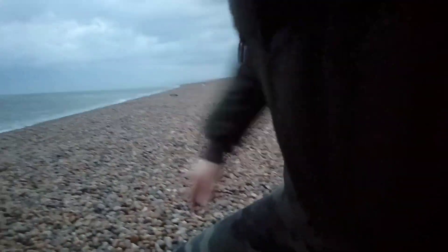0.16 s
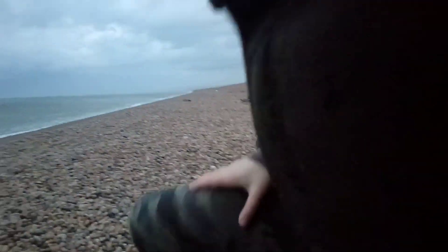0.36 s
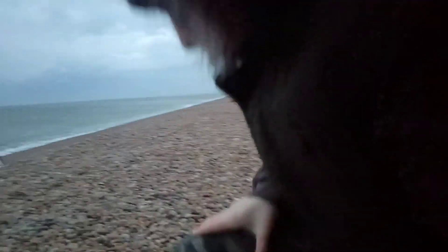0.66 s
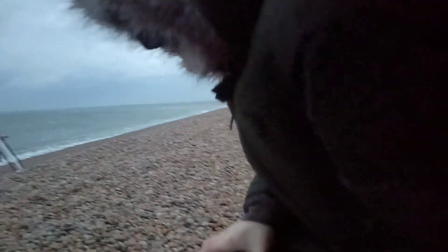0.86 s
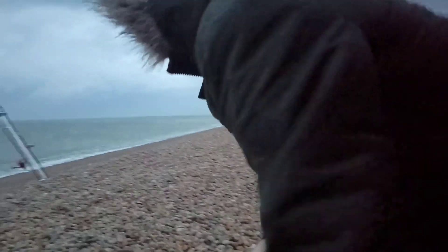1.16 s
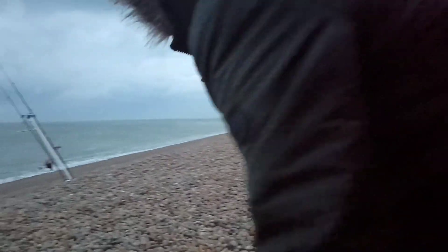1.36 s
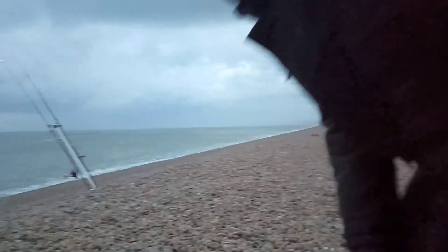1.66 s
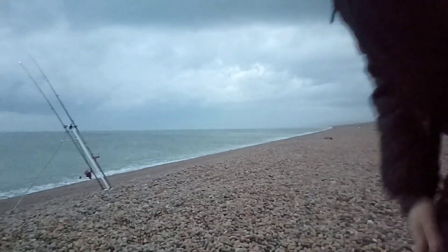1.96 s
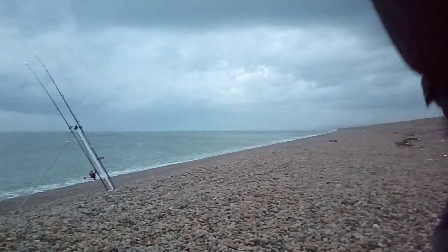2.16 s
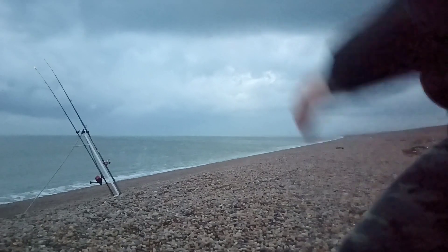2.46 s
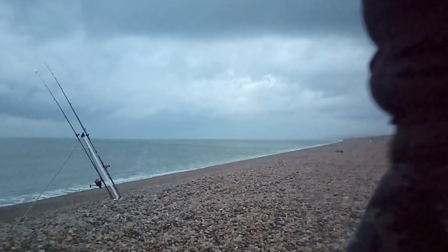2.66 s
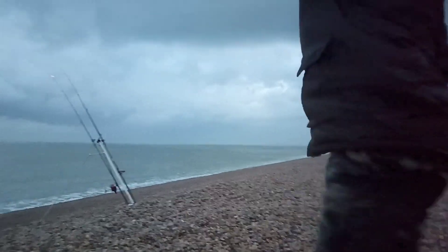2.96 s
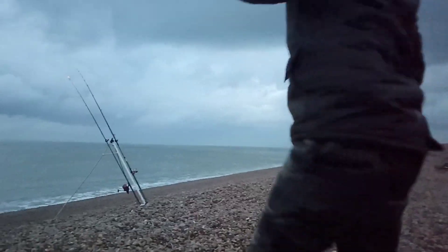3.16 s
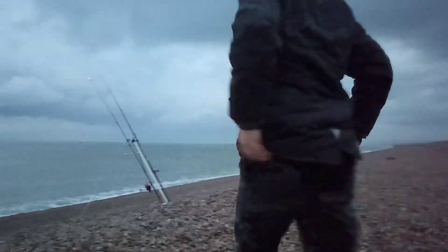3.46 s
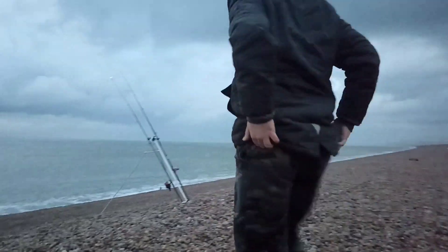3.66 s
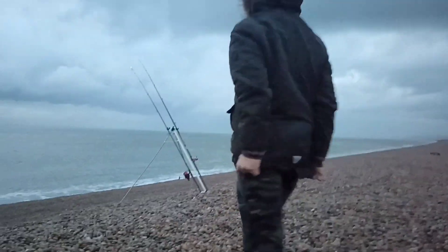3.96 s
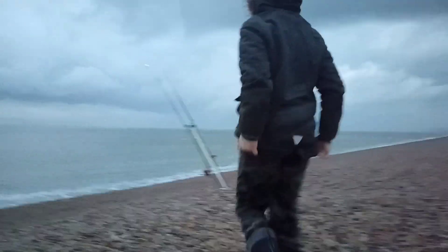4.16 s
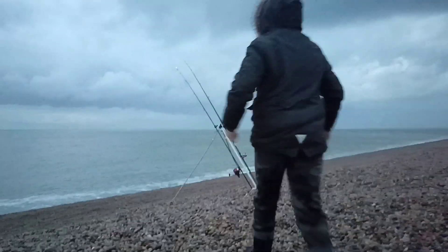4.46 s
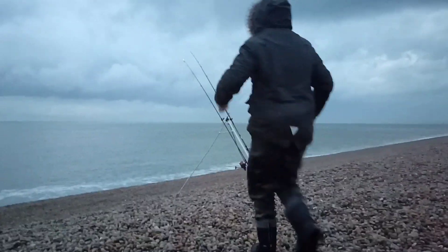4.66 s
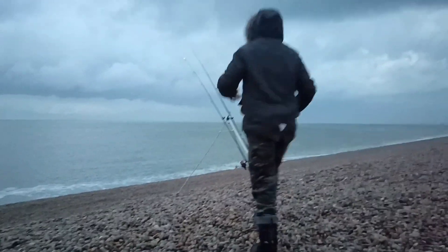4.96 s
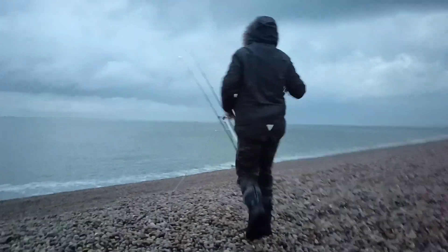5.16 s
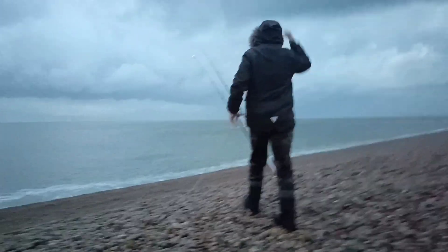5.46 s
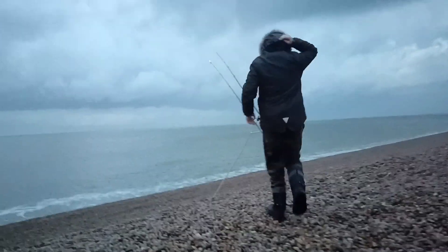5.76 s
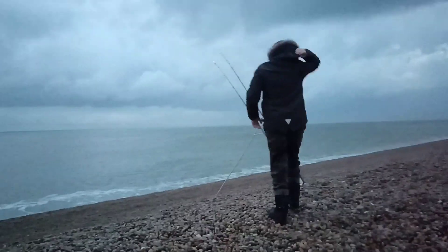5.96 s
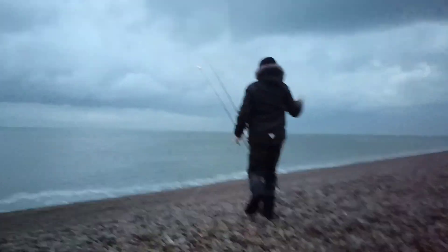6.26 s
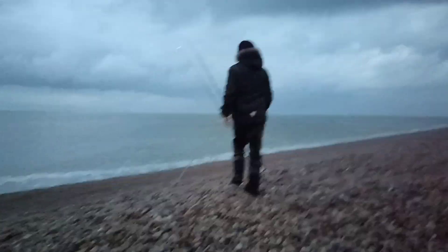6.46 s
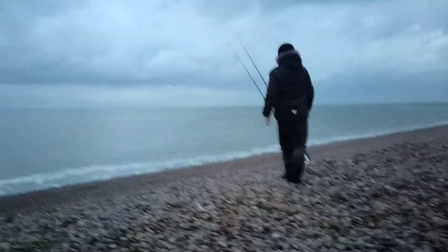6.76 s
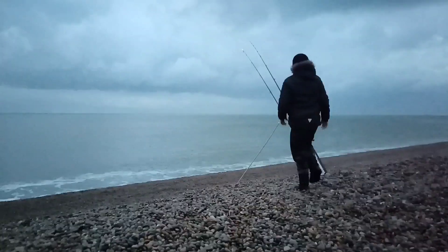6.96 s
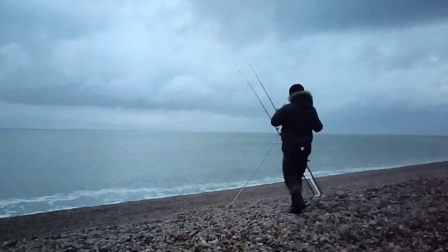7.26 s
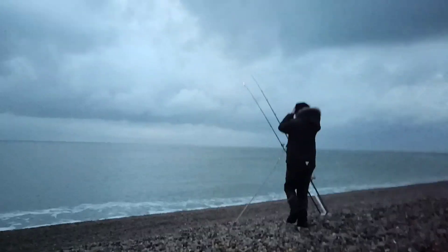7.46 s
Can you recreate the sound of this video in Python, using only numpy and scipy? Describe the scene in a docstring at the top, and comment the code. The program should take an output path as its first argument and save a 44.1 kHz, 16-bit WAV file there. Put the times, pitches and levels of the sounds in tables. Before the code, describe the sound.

Outdoors on a shingle beach, close stereo hand-held microphone, no echo. It starts almost quiet, then from about 0.25 s boots grind into loose pebbles, slightly left, with sharp stone clacks, strongest around 0.3-0.8 s. Looser crunches come near 1.4 and 1.7 s, with hollow knocks of bigger stones. Around 1.9-2.6 s the stones nearly stop: two very faint, thin metallic pings, and at 2.45 s a brief low cloth bump and swish on the right. Crunching resumes at 2.8 s, with a dense burst of pebbles at 3.0-3.4 s, then a step at 4.0 and scattered clacks. From 4.7 to 6.2 s the walker moves off and the stones sound more distant, yet long gritty steps and bright clacks continue, clustering at 7.0-7.5 s. Soft low wind puffs appear near 5.3, 5.7, 6.8 and 7.4 s. Faint surf and hiss persist underneath.

```python
"""From the start, boots grind a shingle beach beside a hand-held camera, over faint surf, light wind and hiss.
Someone gets up and trudges: each step drives random stone contacts; kicked pebbles clack, big stones knock, and
near 1.5 s something scuffs with two hollow rings. Two faint metallic pings are decaying sines; near 2.4 s a
coat brushes the right microphone port as shaped noise. From 4.7 to 6.2 s the stones take on a more distant
colour as the walker moves off, still stepping to the end. Throughout, the right port favours sound near 6 kHz
and the left near 7 kHz."""
import sys
import numpy as np
from scipy import signal
from scipy.fft import rfft, irfft, next_fast_len
from scipy.io import wavfile
from scipy.ndimage import uniform_filter1d, map_coordinates

SR = 44100
rng = np.random.default_rng(int(sys.argv[2]) if len(sys.argv) > 2 else 0)


def dump(signal):
    """Clip the signal to [-1, 1] and save it as 16-bit WAV at the path in sys.argv[1]."""
    limited = np.clip(np.atleast_2d(signal).T, -1, 1)
    pcm = np.round(limited * 32767).astype(np.int16)
    wavfile.write(sys.argv[1], SR, pcm)


N = 335601

# Where the boots are, left or right of the microphone: (time [s], left minus right [dB])
BOOT_PLACE = [(0, 3.5), (1.2, 1), (1.7, 0.5), (3.2, 1), (3.7, -0.5), (4.8, -1.5), (6.2, 3), (7.61, -0.5)]
# Arrival lag of the boots at the left port, scaled for each contact: (time [s], lag [s])
LEFT_LAG = [(1.5, 0.00042), (2.5, 0.00037), (4.6, 0.000074), (5.3, .00036), (7.5, 0.00028)]
# A boot loads the bed, bears on it and lets go; levels are at full force:
# (start [s], rise [s], hold [s], release [s], surface clatter [dB], grinding below [dB],
#  hard-contact sparkle [dB], thud [dB])
STEPS = [ (0.0, 0.0061, 0.13, 0.073, -45.5, -48, -87, -60.5),
         (0.248, 0.042, 0.12, 0.078, -23, -28, -31.5, -44.5),
         (0.553, 0.049, 0.048, 0.2, -20.5, -32.5, -35.5, -40),
         (0.832, 0.074, 0.12, 0.24, -28, -36, -63.5, -45.5),
         (0.986, 0.065, 0.12, 0.055, -33, -33.5, -50.5, -46.5),
         (1.385, 0.03, 0.026, 0.09, -21, -44, -45.5, -43),
         (1.429, 0.076, 0.05, 0.1, -23, -27.5, -29, -36.5),
         (1.715, 0.012, 0.03, 0.095, -16, -28.5, -31, -36.5),
         (2.245, 0.16, 0.061, 0.16, -49.5, -48.5, -87.5, -73),
         (2.77, 0.0099, 0.044, 0.11, -19, -33.5, -38.5, -47),
         (2.859, 0.15, 0.011, 0.11, -21.5, -34.5, -38, -48.5),
         (3.391, 0.11, 0.14, 0.063, -20, -33, -43.5, -43.5), (3.833, .06, .09, .1, -45, -49.5, -87.5, -83),
         (3.973, 0.0099, .028, 0.062, -20, -33.5, -28.5, -35),
         (3.981, 0.055, 0.05, 0.18, -24, -34.5, -43, -45), (4.246, 0.069, .2, .06, -50, -52.5, -76, -76),
         (4.523, 0.056, .12, 0.046, -24, -35.5, -49, -64),
         (5.06, 0.061, 0.091, 0.14, -26.5, -34.5, -54, -49.5),
         (5.199, 0.2, 0.21, 0.15, -19, -39.5, -34, -43),
         (5.617, 0.065, 0.23, 0.11, -18.5, -33.5, -36.5, -42.5),
         (5.907, 0.058, 0.12, .1, -29, -37.5, -62, -46.5),
         (6.067, 0.029, 0.043, 0.18, -20.5, -37.5, -43.5, -66.5),
         (6.169, 0.056, .12, 0.38, -18.5, -30, -42, -48),
         (6.449, 0.17, 0.06, 0.084, -22.5, -29.5, -43, -44.5),
         (6.625, 0.1, 0.16, 0.136, -32.5, -34.5, -62, -47.5),
         (6.758, .15, 0.088, 0.12, -22.5, -61.5, -45.5, -49),
         (6.997, 0.076, 0.12, 0.11, -23.5, -61, -46, -47),
         (7.211, 0.061, 0.11, 0.24, -23, -44.5, -47, -45.5),
         (7.408, .06, 0.066, 0.088, -25.5, -67, -43.5, -45.5)]
# Spectrum of the surface stones: (frequency [Hz], relative density [dB per Hz])
CLATTER_SPECTRUM = [(300, -53), (900, -39), (1500, -25.5), (2200, -13.5), (3200, -12), (4700, -5),
                    (5500, 0.5), (6000, 2.5), (6700, -2), (7400, -9.5), (8400, -28.5), (9500, -43),
                    (12000, -43.5), (16000, -85.5)]
# Spectrum of the buried stones: (frequency [Hz], relative density [dB per Hz])
GRIND_SPECTRUM = [(120, -24), (300, -2), (500, -3.5), (730, -2), (950, 0), (1450, 3.5), (2100, 7.5),
                  (3000, 2), (4500, 3.5), (8000, -51)]
# Spectrum of the hardest contacts: (frequency [Hz], relative density [dB per Hz])
SPARKLE_SPECTRUM = [(5000, -31.5), (7500, 13), (9000, 3.5), (10000, -1.5), (11500, -6), (13000, -15),
                    (16000, -20)]
# Spectrum of the thuds and wind rumble: (frequency [Hz], relative density [dB per Hz])
RUMBLE_SPECTRUM = [(25, -24), (60, -18), (90, -1), (130, 2.5), (180, -0.5), (260, -4.5), (350, -17),
                   (600, -38.5), (1500, -54)]
# Light wind on the ports: (time [s], level [dB])
BREEZE = [(0, -69), (1.9, -63), (2.7, -63), (3.8, -61.5), (5.0, -84), (5.25, -61.5), (7.61, -67)]
# Low puffs over the breeze: (centre time [s], peak level [dB], half-length to 1/e [s])
PUFFS = [(3.101, -41, 0.031), (3.417, -42.5, 0.055), (4.331, -48, 0.021), (5.255, -38, 0.013),
         (5.362, -28.5, 0.016), (5.728, -31, .05), (5.883, -42.5, 0.021), (6.795, -34.5, .08),
         (7.274, -38.5, .05), (7.476, -33.5, 0.013)]
# Spectrum of the surf: (frequency [Hz], relative density [dB per Hz])
SURF_SPECTRUM = [(25, -21), (60, 0), (120, -4), (240, -11.5), (450, -7), (1500, -8.5), (3500, -16.5),
                 (6000, -14), (9000, -19.5), (16000, -38.5)]
# Kicked pebbles, before placing:
# (strike time [s], strike peak [dB], neighbours' rattle re strike [dB], sparkle re strike [dB])
KICKED_PEBBLES = [(.013, -20.5, -22.5, -36), (.1777, -19.5, -21.5, -37), (.1903, -21, -13, -53),
                  (.2217, -25, -10.5, -25.5), (.2999, -9, -10, -14.5), (.3798, -7, -11.5, -6),
                  (.4584, -1, -20, -10), (.5143, -9, -12.5, -18.5), (.5733, -8, -14.5, -2.5),
                  (.5996, -8, -10, -9), (.7211, -8.5, -18, -31), (.8013, -15.5, -9.5, -25.5),
                  (1.0713, -10.5, -4.5, -20), (1.2695, -33.5, -2.5, -47), (1.3998, -23, -4.5, -34),
                  (1.7286, -12, -8.5, -9), (1.9375, -22, -9.5, -9), (2.025, -50, -12, -25),
                  (2.6712, -43, -17, -8), (2.7247, -37.5, -14, -20), (2.9999, -12.5, -2, -20),
                  (3.0484, -8.5, -11.5, -13), (3.0757, -11, -7, -8), (3.1611, -11.5, -15, -12),
                  (3.1925, -18, -11, -4), (3.1973, -4.5, -15, -8.5), (3.2216, -23, -10, -25.5),
                  (3.2616, -17, -12.5, -12.5), (3.3235, -12.5, -9, -7), (3.5158, -9.5, -7.5, -23),
                  (3.9784, -7.5, -15.5, -22), (4.2037, -8.5, -20, -23.5), (4.266, -11, -19.5, -16.5),
                  (4.3149, -20.5, -24, -41), (4.3757, -11, -22.5, -12), (4.3961, -18.5, -23.5, -16.5),
                  (4.4145, -28.5, -9, -17), (4.5477, -15.5, -12.5, -24), (4.7013, -22.5, -23, -22),
                  (4.7515, -23.5, -20.5, -19.5), (5.0655, -17.5, -16.5, -23), (5.1343, -18.5, -2, -33),
                  (5.443, -12, -15, -1.5), (5.5376, -5.5, -10.5, -12.5), (5.5992, -7, -12, -8.5),
                  (5.645, -6, -29, -8), (5.7546, -7.5, -15.5, -7), (5.805, -6.5, -18.5, -19),
                  (5.887, -10, -13, -17.5), (6.1082, -17.5, -9.5, -10.5), (6.152, -10.5, -13, -13.5),
                  (6.3331, -13.5, -12.5, -18), (6.905, -10.5, -9.5, -18.5), (6.9533, -3.5, -17, -24),
                  (6.971, -4.5, -21.5, -23.5), (6.9822, -5, -20.5, -16.5), (7.0374, -5, -15.5, -17.5),
                  (7.0669, -3, -17.5, -11.5), (7.1204, -11, -13, -5), (7.1308, -8, -21.5, -2.5),
                  (7.1939, -10, -10, -9.5), (7.26, -12, -18.5, -15), (7.312, -12, -12, -32.5),
                  (7.355, -8, -13.5, -17.5), (7.4213, -10.5, -12.5, -12), (7.4896, -9, -16, -11.5),
                  (7.5429, -8, -21, -13)]
# Big stones knocking hollowly, and near 1.5 s a scuff ringing at two pitches: (time [s], peak [dB], ring [Hz],
# chatter's 60 dB decay [s])
KNOCKS = [(0.531, -40, 1015, 0.16), (0.674, -29, 620.5, 0.059), (.68, -30, 1090, 0.049),
          (1.5, -26.5, 744, 0.26), (1.503, -24.5, 1450, 0.27), (1.74, -36.5, 824, 0.073),
          (2.768, -29, 2374, .08), (3.196, -48, 604, 0.014), (4.06, -33.5, 570, 0.066),
          (4.324, -45, 830, 0.037), (4.327, -34.5, 1190, 0.11), (4.466, -41.5, 1290, 0.11)]
# Something small and metallic jolted, level before its flutter: (time [s], level [dB])
PINGS = [(1.934, -50.5), (2.49, -55)]
# Spectrum of the air that the coat pumps into the port: (frequency [Hz], relative density [dB per Hz])
COAT_SPECTRUM = [(30, -44), (70, -7.5), (110, 14.5), (170, -8.5), (250, 0), (330, -14), (500, -15),
                 (750, -45), (2000, -69.5)]
# Spectrum of the cloth's hiss: (frequency [Hz], relative density [dB per Hz])
SWISH_SPECTRUM = [(350, -44), (600, -13), (1220, -24), (1820, -12), (4000, -9), (5940, 0), (7050, -4),
                  (9680, -40), (14000, -55)]
# Colour of the stones when the walker is far: (frequency [Hz], gain [dB])
FAR_COLOUR = [(250, 2.5), (480, 3), (850, 0.5), (1400, 1), (2200, -3), (3200, 1.5), (6000, -3), (10000, 4),
              (15000, -8)]
# Response of the microphone ports, right near 6 kHz and left near 7 kHz: (frequency [Hz], left minus right [dB])
PORT_BALANCE = [(60, -6), (200, -2.5), (400, -2), (770, -1), (1200, -4.5), (1650, -7), (2300, -2),
                (2750, 1.5), (3600, -3), (4800, -4), (5900, -10.5), (7300, 6.5), (8300, 3.5), (13000, 1)]

SWING_DB = 24.5  # a step climbs this far during its rise and falls this far during its release
STROKE_BEND = 1.17  # over 1: a step lets go ever faster, so the gaps stay quiet
GRIND_SWING, SPARKLE_SWING, THUD_SWING = 0.72, 1.73, 0.57  # sparkle needs force; grinding and thud linger
LUMPS_PER_S, LUMPS_DB = 22, 2.5  # thud and breeze come in uneven lumps
LEAD_S = .003  # a kicked pebble grazes its neighbours this long before it strikes
# Stray stones: how many, how late, peak after a 0 dB clatter, dB per dB of clatter, scatter either way
STRAYS_PER_S, STRAY_DELAY_S, STRAY_DB, STRAY_FOLLOW, STRAY_SCATTER_DB = 11, 0.033, 2, 0.81, 0.5
PING_HZ, PING_T60_S = 1890, 0.37
BRUSH_START_S, BRUSH_RISE_S, BRUSH_HOLD_S, BRUSH_RELEASE_S = 2.443, 0.0099, 0.019, 0.026
BRUSH_DB, SWISH_DB, SWISH_SWING = -15, -27, 0.69  # at full force, before the high-pass and the split to ports
LEAVES_S, FAR_S = 4.7, 6.2  # the walker moves off between these times
HISS_DB = -82.5  # the microphone's own noise
TOP_HZ = 16200  # band limit


def amp(db):
    """Decibels to gain."""
    return np.exp(np.asarray(db) * float(np.log(10) / 20))


def unit(x):
    """x at rms 1."""
    return x / np.sqrt(np.mean(x ** 2) + 1e-20)


def to_peak(x):
    """Each channel of x at peak 1."""
    return x / np.abs(x).max(-1, keepdims=True)


def along(points, hz):
    """(Hz, value) points read on a log frequency axis."""
    f, v = np.transpose(points)
    return np.interp(np.log(hz + 1), np.log(f + 1), v)


def curves(rows):
    """One value per sample for each column after the time."""
    s, *cols = np.transpose(rows)
    return [np.interp(np.arange(N) / SR, s, c) for c in cols]


def coloured(x, spectrum):
    """x through the causal, minimum-phase filter that has this spectrum."""
    n = x.shape[-1]
    m = 2 * next_fast_len(n // 2 + 2048)
    cepstrum = irfft(np.log(amp(along(spectrum, np.fft.rfftfreq(m, 1 / SR)))))
    # folding the cepstrum onto positive time makes the filter causal
    cepstrum[1:m // 2] *= 2
    cepstrum[m // 2 + 1:] = 0
    return irfft(rfft(x, m) * np.exp(rfft(cepstrum)), m)[..., :n]


def steady(x, span):
    """x held near rms 1 over span seconds, keeping its faster grain."""
    size = max(int(span * SR), 2)
    power = uniform_filter1d(uniform_filter1d(np.mean(x ** 2, 0), size), size)
    return x / np.sqrt(np.abs(power) + 1e-12)


def noise(spectrum, alike):
    """Stereo noise, partly shared by both ports."""
    alike = np.clip(alike, 0, 1)
    w = rng.standard_normal((3, N))
    return unit(coloured(np.sqrt(alike) * w[0] + np.sqrt(1 - alike) * w[1:], spectrum))


def wobble(rate):
    """A smooth random curve, rate knots a second."""
    knots = rng.standard_normal(int(N * rate / SR) + 4)
    return map_coordinates(knots, [np.arange(N) * rate / SR])


def mottled(x, depth_db, size):
    """The colour shifts from moment to moment: patches of gain, a few bins wide and a few frames long."""
    z = signal.stft(x, nperseg=size)[2]
    field = rng.standard_normal(z.shape[1:])
    field = uniform_filter1d(uniform_filter1d(field, size=3, axis=0), size=3, axis=1)
    return signal.istft(z * amp(depth_db * unit(field)), nperseg=size)[1][:, :N]


def stroke_db(t, rise, hold, release):
    """Rise, hold and release, in dB re full force, t seconds after the start."""
    rising = 1 - t / max(rise, 1e-3)
    releasing = (t - rise - hold) / max(release, 1e-3)
    short = np.maximum(rising, releasing)
    return -SWING_DB * np.maximum(short, 0) ** STROKE_BEND


def footwork():
    """Gain of clatter, grinding, sparkle and thud: each step drives all four with one stroke."""
    swing = np.array([[1], [GRIND_SWING], [SPARKLE_SWING], [THUD_SWING]])
    t = np.arange(N) / SR
    power = np.zeros((4, N))
    for start, rise, hold, release, *levels_db in STEPS:
        live = slice(*np.searchsorted(t, [start - 2 * rise, start + rise + hold + 3 * release]))
        force_db = stroke_db(t[live] - start, rise, hold, release)
        power[:, live] += amp(np.array(levels_db)[:, None] + swing * force_db) ** 2
    return np.sqrt(power)


def slips(rate, spread_db, life, creep):
    """The bed gives way in jerks: each starts at once and dies away, over a steady creep."""
    jerks = (rng.random(N) < rate / SR) * amp(spread_db * np.minimum(rng.standard_normal(N), 2))
    return creep + unit(signal.lfilter([1], [1, -np.exp(-1 / (life * SR))], jerks))


def contacts(rate, top_hz, spread_db, life, scatter_db):
    """Stones touching at random: tiny damped rings of any pitch, reaching the right port first."""
    count = min(int(rate * N / SR), 40000)
    draws = rng.random((count, 6)).astype(np.float32)
    when, pitch, phase, size, side, bearing = np.hsplit(draws, 6)
    t = np.arange(96, dtype=np.float32) / SR
    strength = amp(spread_db * np.minimum(-np.log(1 - size), 3))
    rings = np.sin(2 * np.pi * (top_hz * pitch * t + phase)) * np.exp(-t / life) * strength
    start = (when * (N - 1)).astype(int)
    lag = (curves(LEFT_LAG)[0][start] * (0.22 + 1.6 * bearing) * SR).astype(int)

    def port(at, gain):
        """All the rings summed at one port."""
        return np.bincount((at + np.arange(len(t))).ravel(), (gain * rings).ravel(), N)[:N]

    left = port(start + lag, amp(scatter_db * (side - .5)))
    right = port(start, amp(scatter_db * (.5 - side)))
    return np.array([left, right])


def shingle(clatter, grind, sparkle):
    """Boots in the pebbles: bright clatter on top, duller grinding below, sparkle from the hardest contacts."""
    jerks = slips(rate=150, spread_db=4.5, life=0.006, creep=2.3)
    surface = jerks * contacts(rate=4500, top_hz=14510, spread_db=-2.5, life=0.00017, scatter_db=3.5)
    surface = mottled(surface, depth_db=4.0, size=512)
    buried = np.sqrt(jerks) * contacts(rate=4000, top_hz=5000, spread_db=0.0, life=0.0008, scatter_db=4)
    buried = mottled(buried, depth_db=3.5, size=1024)
    return (clatter * steady(coloured(surface, CLATTER_SPECTRUM), span=0.035)
            + grind * steady(coloured(buried, GRIND_SPECTRUM), span=0.011)
            + sparkle * steady(coloured(surface, SPARKLE_SPECTRUM), span=0.0087))


def rumble(thud):
    """The bed thuds under the walker's weight and light wind flutters on the ports: shaped low noise."""
    t = np.arange(N) / SR
    breeze_db, = curves(BREEZE)
    puffs = sum((amp(db) * np.exp(-((t - s) / half) ** 2)) ** 2 for s, db, half in PUFFS)
    lumps = amp(LUMPS_DB * wobble(LUMPS_PER_S))
    level = np.sqrt((thud ** 2 + amp(breeze_db) ** 2) * lumps ** 2 + puffs)
    return level * steady(mottled(noise(RUMBLE_SPECTRUM, alike=0.42), depth_db=3, size=2048), span=0.12)


def surf():
    """Faint surf behind the stones: steady broad noise, little of it shared by the ports."""
    return amp(-71.0) * noise(SURF_SPECTRUM, alike=0.18)


def hiss():
    """The microphone's own white noise, independent in each port."""
    return amp(HISS_DB) * rng.standard_normal((2, N))


def clacks(rows):
    """A kicked pebble strikes once, sharply, then rebounds and rattles its neighbours."""
    t = np.arange(SR // 12) / SR
    out = np.zeros((2, N + SR))
    # a quick swell, a fast decay and a weaker, longer tail
    fade = (1 - np.exp(-t / 0.0027)) ** 2 * (amp(-60 * (t - .009) / 0.049) + 0.2 * amp(-60 * t / 0.23))
    blows = []
    for _ in rows:
        contact = rng.standard_normal((2, len(t))) * t * np.exp(-t / .0003)
        ring = np.sin(2 * np.pi * rng.uniform(6530, 6640) * t) * np.exp(-t / 0.00027)  # the stone's own note
        strike = np.roll(to_peak(contact) + 1.7 * ring, round(LEAD_S * SR), axis=1)
        grain = rng.standard_normal((2, len(t)))
        uneven_db = 3 * np.interp(t, t[::64], rng.standard_normal(len(t[::64])))
        blows.append([strike, grain * amp(uneven_db)])
    bodies = coloured(np.array(blows), CLATTER_SPECTRUM)
    sparkles = coloured(np.array(blows), SPARKLE_SPECTRUM)
    for (s, strike_db, rattle_db, sparkle_db), body, sparkle in zip(rows, bodies, sparkles):
        first = max(round((s - LEAD_S) * SR), 0)
        for (strike, rattle), db in (body, 0), (sparkle, sparkle_db):
            blow = to_peak(strike) + amp(rattle_db) * fade * unit(rattle)
            out[:, first:][:, :len(t)] += amp(strike_db + db) * blow
    return mottled(out[:, :N], depth_db=2.5, size=256)


def strays(clatter, rattle_db, sparkle_db):
    """Clack rows for disturbed stones that topple by chance, louder after a harder step."""
    count = int(STRAYS_PER_S * N / SR)
    when, size = rng.random((count, 2)).T
    s = when * (N - 1) / SR
    stirred = np.interp(s - STRAY_DELAY_S, np.arange(N) / SR, clatter)
    stirred_db = 20 * np.log10(stirred + 1e-4)
    strike_db = STRAY_DB + STRAY_FOLLOW * stirred_db + STRAY_SCATTER_DB * (2 * size - 1)
    return [(at, db, rattle_db, sparkle_db) for at, db in zip(s, strike_db)]


def knocks():
    """Big stones bump and chatter in the bed, and something scuffs near 1.5 s, each row in one narrow
    resonance."""
    t = np.arange(SR // 5) / SR
    out = np.zeros(N + SR)
    for s, db, hz, t60 in KNOCKS:
        chatter = rng.standard_normal(len(t)) * amp(-60 * t / t60)
        resonance = np.sin(2 * np.pi * hz * t) * t * np.exp(-t / 0.0013)
        ring = signal.fftconvolve(chatter, resonance)[:len(t)]
        out[round(s * SR):][:len(t)] += amp(db) * to_peak(ring)
    return out[:N]


def pings():
    """Something small and metallic: one thin, unsteady mode dies away after each jolt."""
    t = np.arange(SR // 2) / SR
    out = np.zeros(N + SR)
    for s, db in PINGS:
        out[round(s * SR):][:len(t)] += amp(db - 60 * t / PING_T60_S) * np.sin(2 * np.pi * PING_HZ * t)
    return out[:N] * wobble(210)


def coat():
    """Cloth swishes over the right port and pumps air into it; the slowest pressure leaks away."""
    t = np.arange(SR // 2) / SR - .1
    press_db = stroke_db(t, BRUSH_RISE_S, BRUSH_HOLD_S, BRUSH_RELEASE_S)
    air = coloured(rng.standard_normal((1, len(t))), COAT_SPECTRUM)
    push = amp(BRUSH_DB + press_db) * steady(air, span=0.026)
    push = signal.sosfilt(signal.butter(4, 74, "highpass", fs=SR, output="sos"), push)
    cloth = unit(coloured(rng.standard_normal((2, len(t))), SWISH_SPECTRUM))
    swish = amp(SWISH_DB + SWISH_SWING * press_db) * cloth
    out = np.zeros((2, N))
    first = round((BRUSH_START_S + t[0]) * SR)
    out[:, first:][:, :len(t)] = push * amp([[-20], [0]]) + swish * amp([[-4], [4]])  # left, right
    return out


def receding(x):
    """As the walker moves off, the near sound of the stones gives way to the far one."""
    far = np.interp(np.arange(N) / SR, [LEAVES_S, FAR_S], [0, 1])
    return (1 - far) * x + far * coloured(x, FAR_COLOUR)


def scene():
    """Stones placed between the ports, the background behind them, and the coat at the right port."""
    place_db, = curves(BOOT_PLACE)
    sides = np.array([[.5], [-.5]])  # each port takes half the level difference
    clatter, grind, sparkle, thud = footwork()
    bed = shingle(clatter, grind, sparkle)
    background = rumble(thud) + knocks() + pings() + surf()
    cloth = coat()
    pebbles = clacks(KICKED_PEBBLES + strays(clatter, rattle_db=-9.5, sparkle_db=-19))
    air = receding(bed + pebbles) * amp(sides * place_db) + background
    ports = []
    for x, side in zip(air, sides[:, 0]):
        ports.append(coloured(x, [(hz, side * db) for hz, db in PORT_BALANCE]))
    return np.array(ports) + cloth + hiss()


def record(dry):
    """The camera rounds off peaks near full scale, sheds the deepest bass and keeps nothing above its band limit."""
    m = next_fast_len(N + 4096)
    hz = np.fft.rfftfreq(m, 1 / SR)
    rounded = dry / (1 + np.abs(dry / .95) ** 6) ** (1 / 6)
    bass_cut = hz ** 2 / (hz ** 2 + 30 ** 2)
    band = np.clip((TOP_HZ - hz) / 300 + .5, 0, 1)  # slopes to nothing over 300 Hz
    return irfft(rfft(rounded, m) * bass_cut * band, m)[:, :N]


dry = scene()
out = record(dry)
dump(out)
```